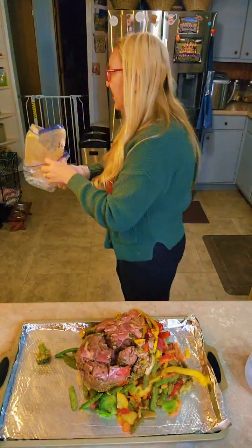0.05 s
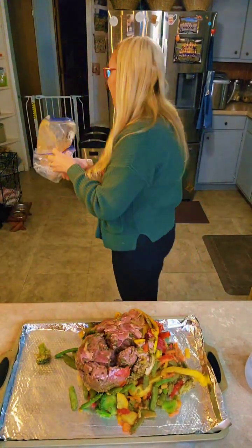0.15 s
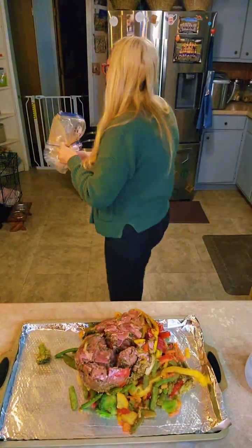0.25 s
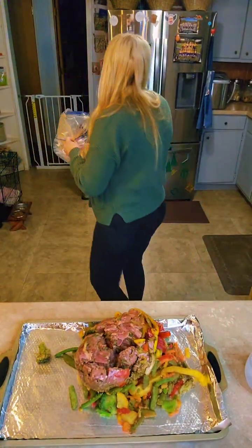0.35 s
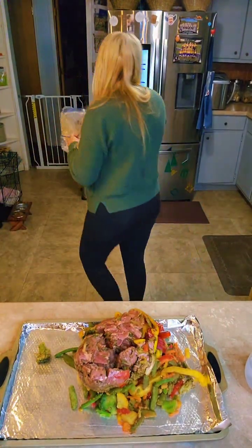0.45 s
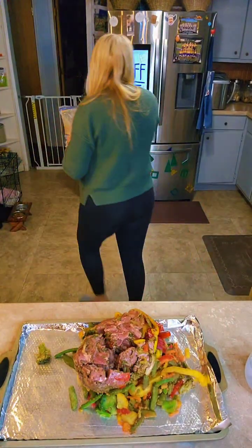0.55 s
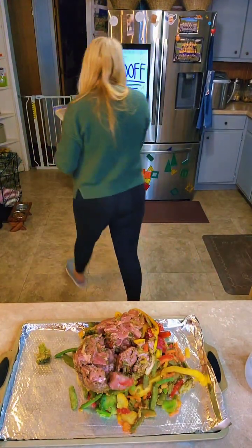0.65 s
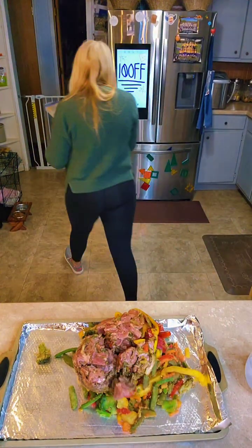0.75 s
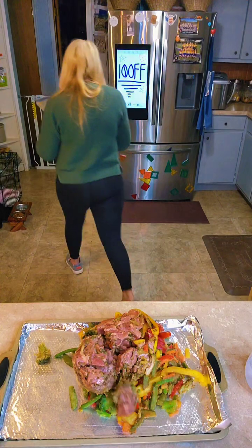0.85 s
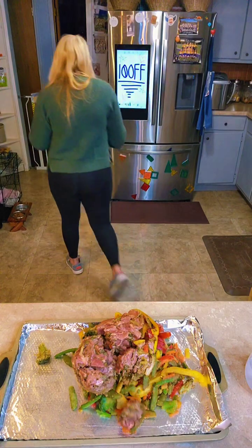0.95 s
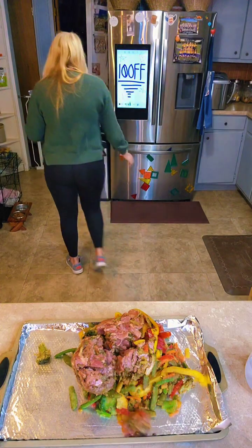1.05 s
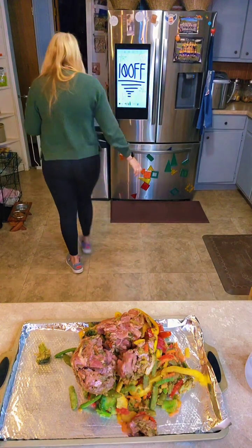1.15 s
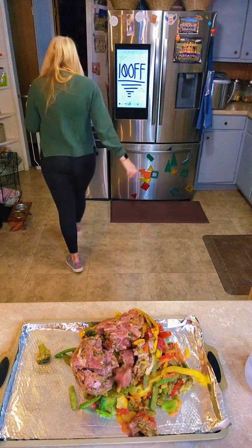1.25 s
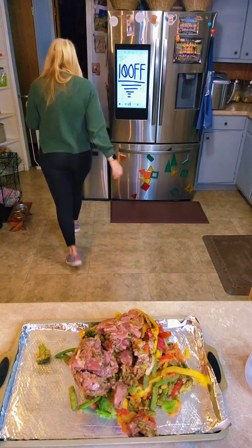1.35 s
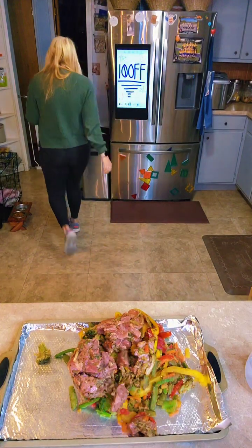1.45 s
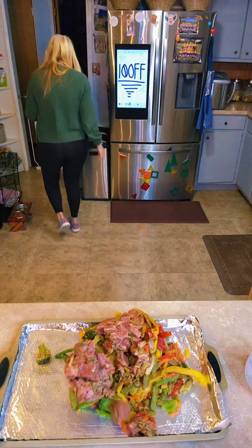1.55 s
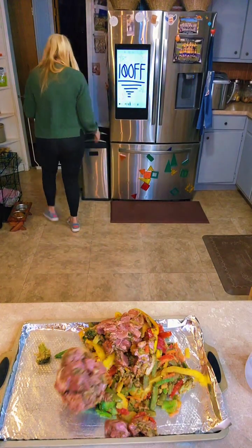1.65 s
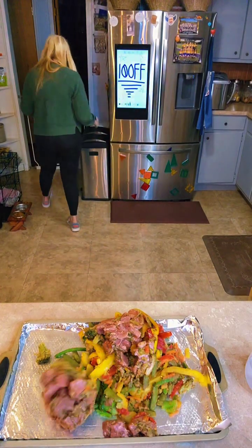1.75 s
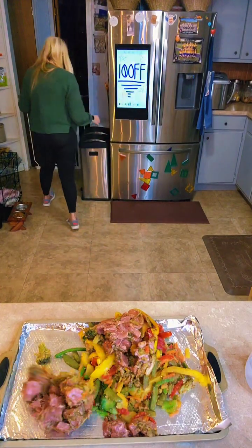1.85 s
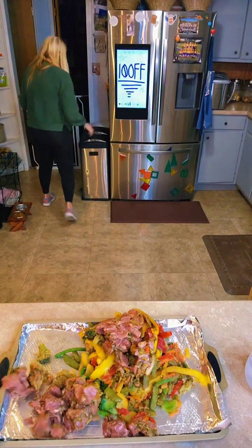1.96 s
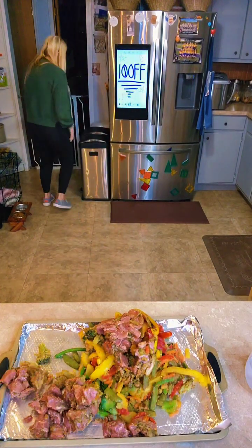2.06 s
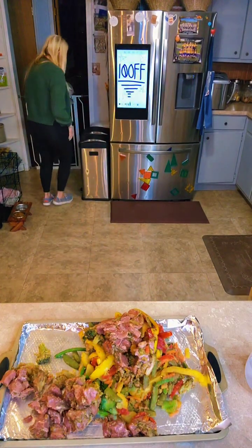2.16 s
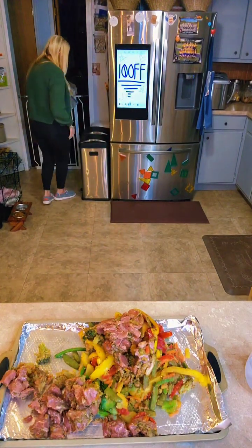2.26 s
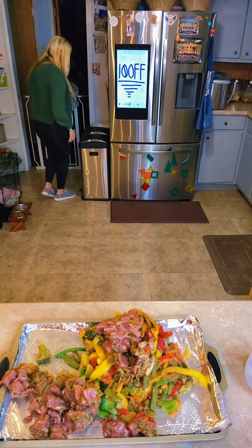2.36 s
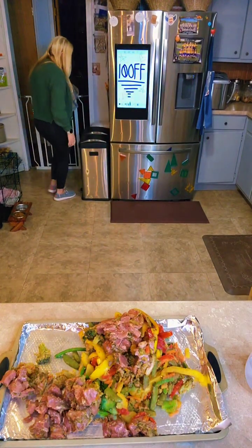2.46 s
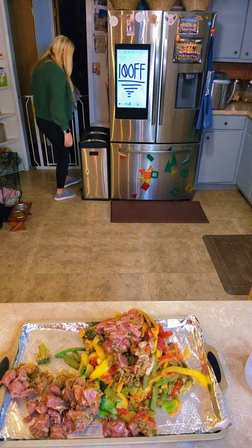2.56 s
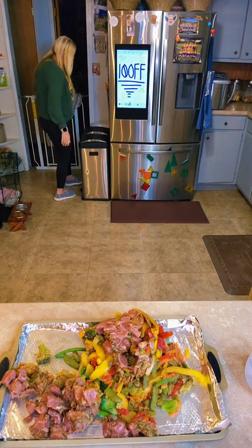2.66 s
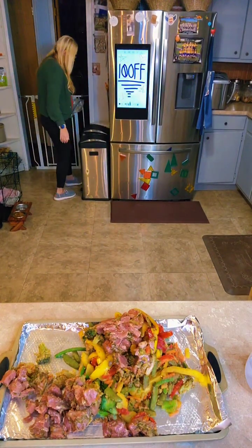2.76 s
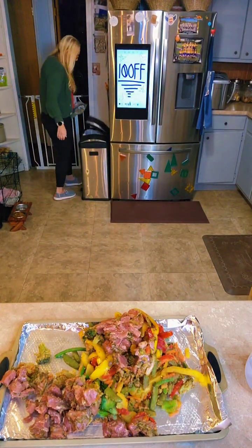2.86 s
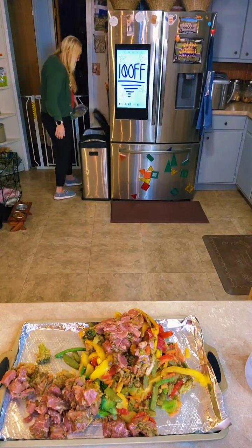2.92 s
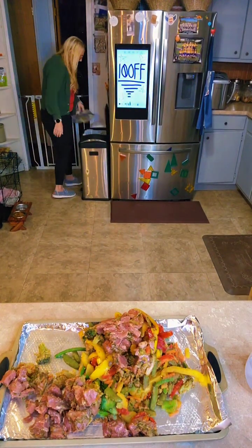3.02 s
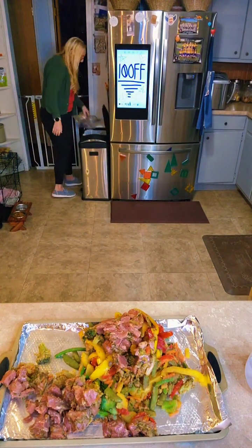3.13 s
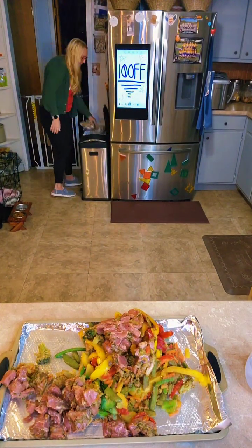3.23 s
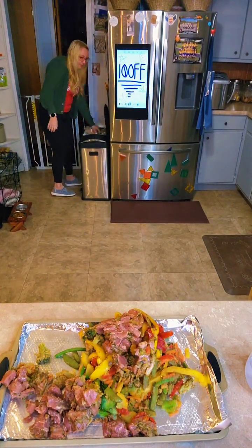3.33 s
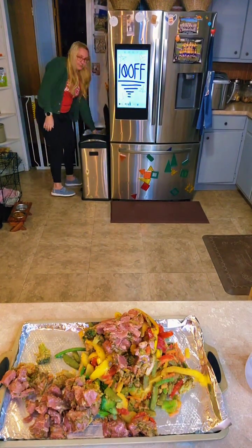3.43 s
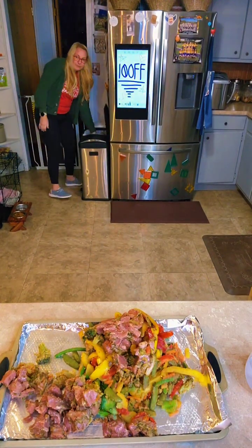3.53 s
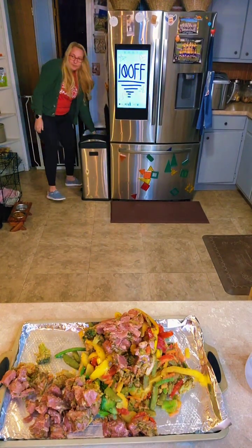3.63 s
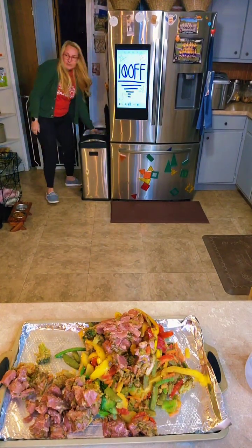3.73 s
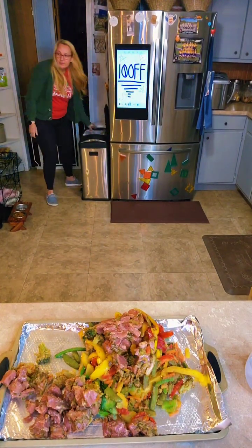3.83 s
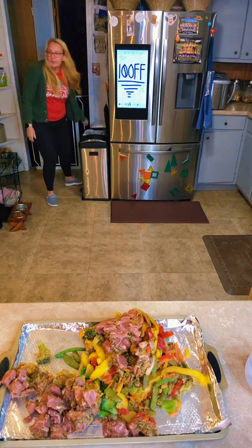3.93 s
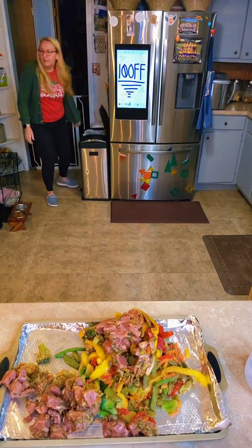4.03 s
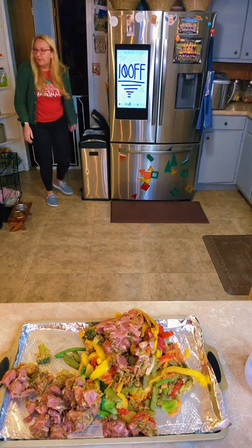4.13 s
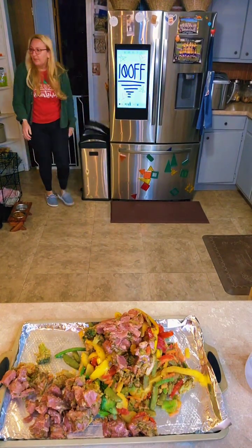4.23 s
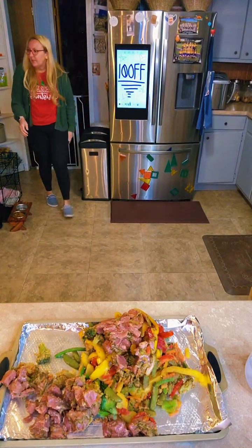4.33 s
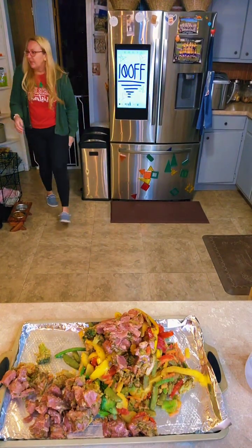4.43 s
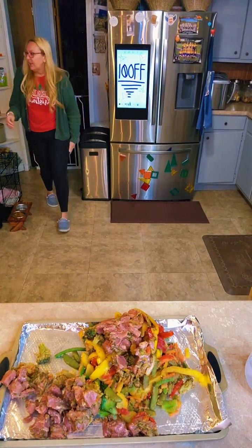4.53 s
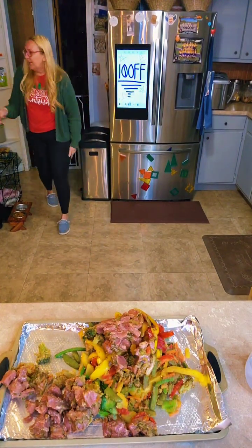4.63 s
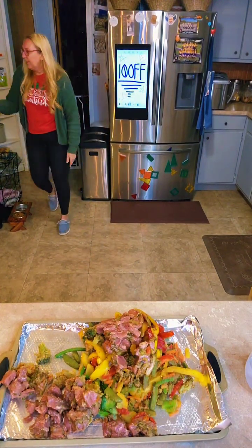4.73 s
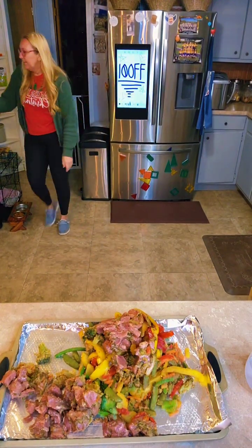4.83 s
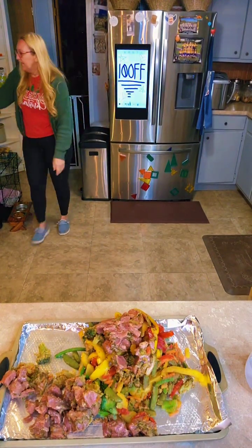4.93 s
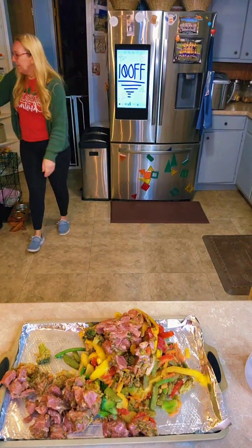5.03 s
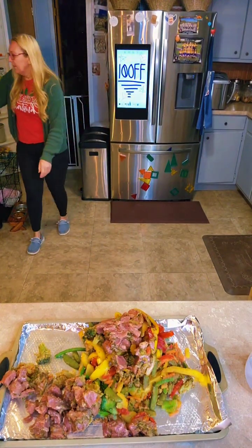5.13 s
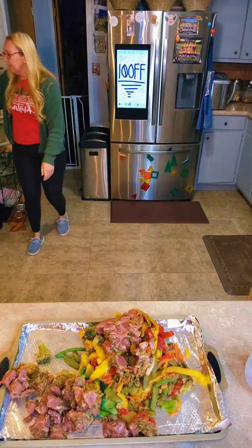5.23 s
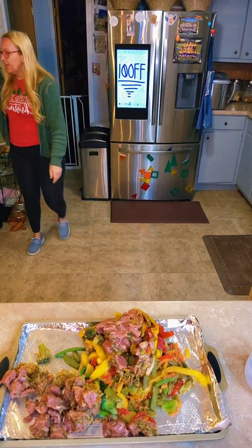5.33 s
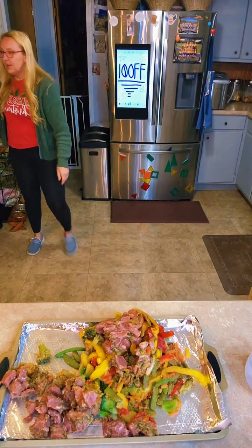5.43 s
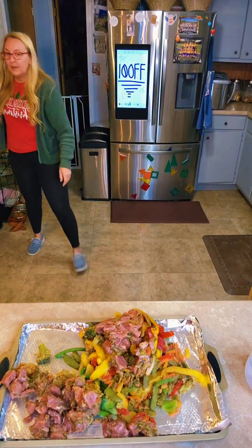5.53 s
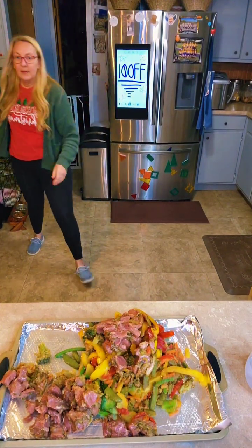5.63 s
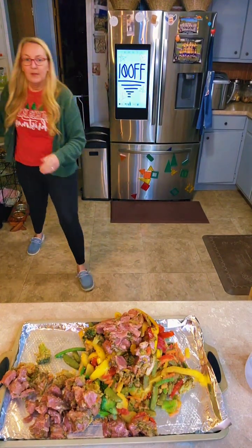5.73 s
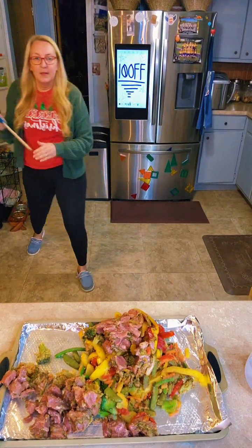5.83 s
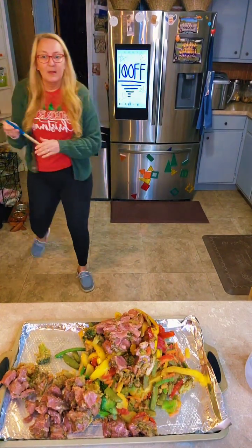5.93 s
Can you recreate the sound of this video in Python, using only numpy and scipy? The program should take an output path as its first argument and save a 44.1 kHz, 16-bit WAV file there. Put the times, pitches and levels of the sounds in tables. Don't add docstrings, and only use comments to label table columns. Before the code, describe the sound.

A plastic bag rustles, is crushed in loud sharp crackles, then a metal pedal bin clanks open and thuds shut in a kitchen.

```python
import sys
import numpy as np
from scipy import signal
from scipy.fft import rfft, irfft, next_fast_len
from scipy.io import wavfile
from scipy.ndimage import map_coordinates

SR = 44100
rng = np.random.default_rng(int(sys.argv[2]) if len(sys.argv) > 2 else 0)


def int16_out(signal):
    q = np.round(np.clip(np.atleast_2d(signal).T, -1, 1) * 32767)
    wavfile.write(sys.argv[1], SR, q.astype(np.int16))


def natural_amplitude(level_db):
    exponent = np.asarray(level_db, float) / 20
    return 10 ** exponent


N = 263806

FLOOR_HZ = 95
# freq_hz, density_db
THUD = [(15, -13), (35, -14), (50, 5), (65, -6), (90, 2.5), (110, -7), (130, -2), (180, -9), (230, -7.5),
        (300, -13), (500, -37.5)]
# freq_hz, density_db
SOLE = [(120, -2.5), (230, -3), (330, -3), (460, 2), (600, -0.5), (720, -2.5), (1100, -8.5), (2000, -30.5)]
# freq_hz, density_db
FILM = [(2000, -41), (4000, -9.5), (6000, -1.5), (9000, 3.5), (10500, -3.5), (12000, -29)]
# freq_hz, density_db
SPARKLE = [(8000, -38), (10500, 8), (13000, 6.5), (16000, -7)]


def unit(x):
    return x / np.sqrt(np.mean(x ** 2) + 1e-20)


def along(points, hz):
    f, v = np.transpose(points)
    return np.interp(np.log(hz + 1), np.log(f + 1), v)


def wobble(rate_hz):
    knots = rng.standard_normal(int(N * rate_hz / SR) + 4)
    return map_coordinates(knots, [np.arange(N) * rate_hz / SR])


def coloured(x, spectrum):
    m = next_fast_len(len(x) + 4096)
    gain = natural_amplitude(along(spectrum, np.fft.rfftfreq(m, 1 / SR)))
    return irfft(rfft(x, m) * gain, m)[:len(x)]


def noise(spectrum, size):
    return unit(coloured(rng.standard_normal(size), spectrum))


def add(track, start_s, sound):
    part = track[round(start_s * SR):][:len(sound)]
    part += sound[:len(part)]


def fade(t, t60_s, attack_s):
    return natural_amplitude(-60 * t / max(t60_s, .002)) * (1 - np.exp(-t / attack_s))


def swells(peaks_db, starts, lengths, rise_db_per_s, fall_db_per_s, idle_db):
    t = np.arange(0, N + 64, 64)[:, None] / SR
    rise_db = rise_db_per_s * np.maximum(starts - t, 0)
    fall_db = fall_db_per_s * np.maximum(t - starts - lengths, 0)
    power = natural_amplitude(idle_db) ** 2 + np.sum(natural_amplitude(peaks_db - rise_db - fall_db) ** 2, axis=1)
    return np.interp(np.arange(N) / SR, t[:, 0], np.sqrt(power))


def room_tails(count):
    # freq_hz, t60_s
    room_t60 = [(80, 0.68), (500, 0.41), (3000, 0.4), (8000, 0.33), (14000, 0.27)]
    hz, t, z = signal.stft(rng.standard_normal((count, SR // 2)), SR, nperseg=256)
    decay = natural_amplitude(-60 * t / along(room_t60, hz)[:, None])
    tails = signal.istft(z * decay, SR, nperseg=256)[1]
    return tails / np.linalg.norm(tails, axis=1, keepdims=True)


def echo(x, tail):
    return signal.fftconvolve(np.pad(x, (round(.004 * SR), 0)), tail)


def hiss():
    # freq_hz, density_db
    hiss_spectrum = [(20, 6), (100, 0.5), (1000, -9.5), (5000, -24.5), (16000, -10)]
    return natural_amplitude(-69.5) * noise(hiss_spectrum, N)


def tread():
    # full_load_s, thud_db, sole_over_thud_db
    steps = [(.08, -53.5, -4.5), (.4, -71, 5), (.63, -58.5, -2), (.82, -67, -7), (1.22, -60, -4.5),
             (1.74, -58, -2.5), (2.08, -55.5, -6), (2.64, -56, -3), (2.74, -62, -31), (3.08, -50, -12.5),
             (3.22, -53, 3.5), (3.5, -53.5, -11), (3.86, -50.5, -5), (4.3, -48, -6), (4.41, -55.5, -17),
             (4.7, -60.5, -4), (5.09, -59, 5), (5.58, -57, -17), (5.8, -69, -0.5)]
    full_load_s, thud_db, sole_db = np.transpose(steps)

    def load(level_db, idle_db):
        return swells(level_db, full_load_s, 0, 62, 63, idle_db)

    boards = noise([(FLOOR_HZ - 45, -30), (FLOOR_HZ, 0), (FLOOR_HZ + 45, -30)], N)
    thud = unit(natural_amplitude(2.2 * wobble(25)) * (noise(THUD, N) + 0.49 * boards))
    sole = unit(natural_amplitude(1.4 * wobble(30)) * noise(SOLE, N))
    return load(thud_db, -74.5) * thud + load(thud_db + sole_db, -91.5) * sole


def knocks():
    # start_s, peak_db, drawn_out (1-10), low_db
    padded = [(1.037, -46, 7, -3.5), (1.171, -63.5, 8.9, 16.5), (1.229, -51, 9.4, 4.5),
              (1.32, -49, 2.8, -4), (1.56, -48.5, 6.5, -3), (1.765, -41, 7.1, 0), (2.47, -43.5, 3.8, 11),
              (2.492, -35.5, 2.4, 9.5), (2.771, -49, 3.8, 6), (2.929, -54, 4.5, 13), (3.429, -64, 9.1, 15),
              (3.68, -47.5, 2.5, 4), (3.712, -50, 4, 5.5), (3.772, -43.5, 4.5, -4),
              (3.783, -40.5, 9.8, -17), (4.817, -36, 5.2, -3.5), (4.966, -40.5, 2.8, 2.5),
              (5.496, -51.5, 7.4, 4)]
    # start_s, peak_db, drawn_out (1-10), low_db
    hard = [(0.114, -42, 3.5, -16), (0.626, -51.5, 3, 11), (0.647, -48, 4.8, 5), (.702, -54, 4.9, 8),
            (1.668, -52.5, 3.6, 14.5), (2.077, -49.5, 3, 13.5), (2.102, -48.5, 4.7, 7),
            (2.205, -45.5, 5.9, 5), (2.51, -38, 4.3, 11), (2.549, -42, 5.7, 6), (3.853, -43, 2.5, -26),
            (4.567, -65, 2.3, 23.5), (5.172, -41.5, 1.5, -19), (5.191, -50, 6.7, 4), (5.555, -40, 5.25, -6),
            (5.762, -58.5, 3.8, 6)]
    # freq_hz, density_db
    edge_spectrum = [(500, -12), (1000, 5), (1600, 1.5), (2500, -3.5), (3000, -14.5), (7000, -35)]
    out = np.zeros(N)
    t = np.arange(SR // 3) / SR
    for rows, edge_db in [(padded, -11.5), (hard, 1.2)]:
        for start_s, peak_db, drawn_out, low_db in rows:
            t60_s = 0.059 * drawn_out
            puff = noise(SOLE, len(t)) + natural_amplitude(edge_db) * noise(edge_spectrum, len(t))
            push = 1.19 * noise(THUD, len(t)) + 0.19 * np.sin(2 * np.pi * FLOOR_HZ * t)
            contact = fade(t, t60_s, 0.0013) * puff
            floor = natural_amplitude(low_db) * fade(t, 1.35 * t60_s, 0.0045) * push
            add(out, start_s, natural_amplitude(peak_db - 8.5) * (contact + floor))
    return out


def rustle():
    # start_s, length_s, crinkle_db, scuff_over_crinkle_db
    rubs = [(-.04, 0.21, -51, -5), (0.164, 0.21, -59, -2.5), (0.36, 0.13, -65, 4), (0.464, 0.13, -48, -8),
            (0.65, 0.29, -60.5, -6.5), (1.142, 0.44, -62.5, -8.5), (1.587, 0.22, -43, -10),
            (2.043, 0.21, -53, -8), (2.304, 0.17, -69, -9), (2.6, 0.32, -93, 0), (2.97, 0.26, -40.5, -10),
            (3.098, 0.24, -41.5, -6), (3.447, 0.18, -53.5, -7), (3.664, 0.054, -62.5, -0.5),
            (3.837, 0.015, -61.5, 13), (3.953, .02, -66.5, -15), (4.262, 0.074, -58.5, -0.5),
            (4.46, 0.42, -64, -4), (4.821, 0.078, -40.5, -17.5), (4.991, 0.1, -48.5, -4),
            (5.078, 0.064, -44, -10), (5.156, 0.084, -52, 4), (5.498, 0.033, -64.5, 1),
            (5.6, 0.15, -73, -2), (5.74, 0.057, -64, -2)]
    # freq_hz, density_db
    scuff_spectrum = [(600, -33), (1200, 2), (2000, 1), (3000, -2), (4500, -2), (7000, -6)]
    start_s, length_s, crinkle_db, scuff_db = np.transpose(rubs)
    rise_s, fade_db_per_s = 0.026, 139.5

    def stroke(level_db, idle_db):
        hold_s = np.maximum(length_s - rise_s, 0)
        return swells(level_db, start_s + rise_s, hold_s, 20 / rise_s, fade_db_per_s, idle_db)

    strength_db = np.minimum(5 * rng.exponential(size=N), 12)
    folds = (rng.random(N) < 260 / SR) * natural_amplitude(strength_db) * rng.standard_normal(N)
    rubbing = 0.16 * unit(folds) + natural_amplitude(1.3 * wobble(60)) * rng.standard_normal(N)
    crinkle = unit(coloured(rubbing, FILM)) + natural_amplitude(-1) * unit(coloured(rubbing, SPARKLE))
    scraping = natural_amplitude(2.0 * wobble(25)) * rng.standard_normal(N) + .2 * unit(folds)
    scuff = unit(coloured(scraping, scuff_spectrum))
    return stroke(crinkle_db - 10.5, -82.5) * crinkle + stroke(crinkle_db + scuff_db, -72.5) * scuff


def singing():
    # start_s, end_s, pitch_hz, width_hz, level_db
    sung_bands = [(3.852, 3.92, 1700, 130, -53), (3.852, 3.88, 3450, 150, -59),
                  (3.852, 3.88, 2390, 110, -62), (5.01, 5.17, 4400, 140, -61), (5.02, 5.17, 4730, 140, -59),
                  (5.25, 5.31, 4230, 130, -60), (5.01, 5.1, 5450, 150, -59), (5.1, 5.19, 5500, 110, -54),
                  (5.09, 5.2, 6200, 500, -53), (5.01, 5.14, 6900, 400, -55), (5.02, 5.13, 7850, 200, -59),
                  (5.185, 5.21, 1550, 150, -53), (5.22, 5.3, 1480, 100, -66), (5.0, 5.07, 2000, 100, -67),
                  (5.12, 5.17, 2500, 80, -67), (5.2, 5.28, 6500, 500, -57), (3.58, 3.62, 5300, 300, -64),
                  (3.8, 3.815, 3000, 400, -57), (5.0, 5.2, 580, 90, -61), (3.965, 4.05, 7000, 1200, -64),
                  (4.83, 4.96, 3150, 200, -69), (5.005, 5.17, 1230, 70, -61), (2.078, 2.1, 2700, 200, -56),
                  (1.88, 1.92, 3500, 450, -60)]
    out = np.zeros(N)
    for start_s, end_s, hz, width_hz, level_db in sung_bands:
        t = np.arange(round((end_s - start_s + 0.086) * SR)) / SR
        near, far = width_hz / 2, 4 * width_hz
        band = noise([(hz - far, -40), (hz - near, -3), (hz + near, -3), (hz + far, -40)], len(t))
        swell_db = np.interp(t, [0, .02, end_s - start_s, t[-1]], [-8, -1, -1, -28])
        add(out, start_s, natural_amplitude(level_db + swell_db) * band)
    return out * natural_amplitude(1.5 * wobble(40))


def trembling_tones(rows):
    out = np.zeros(N)
    for start_s, end_s, from_hz, to_hz, level_db in rows:
        span = slice(round(start_s * SR), round(end_s * SR))
        share = np.linspace(0, 1, span.stop - span.start)
        tremble = 1 + .018 * wobble(120)
        grip = natural_amplitude(1.2 * wobble(45)) * (1 + .4 * wobble(110))
        hz = (from_hz + share * (to_hz - from_hz)) * tremble[span]
        swell = natural_amplitude(level_db) * np.abs(np.sin(np.pi * share)) ** .5 * grip[span]
        out[span] += 2.12 * swell * np.sin(2 * np.pi * np.cumsum(hz) / SR)
    return out


def squeaks_and_groans():
    # start_s, end_s, start_hz, end_hz, level_db
    damper = [(4.575, 4.76, 2440, 2430, -73), (4.74, 4.86, 2410, 2410, -68.5),
              (4.83, 4.98, 2420, 2380, -73), (4.585, 4.63, 2950, 2930, -80), (4.585, 4.61, 1900, 1890, -77),
              (4.585, 4.65, 1140, 1130, -78), (4.6, 4.7, 1350, 1320, -77), (4.67, 4.82, 1090, 1085, -75.5),
              (4.73, 4.8, 1340, 1350, -79), (5.07, 5.13, 1235, 1235, -62), (5.16, 5.21, 1240, 1290, -64),
              (5.34, 5.44, 1490, 1455, -78), (5.74, 5.98, 1650, 1570, -74.5)]
    # start_s, end_s, start_hz, end_hz, level_db
    walls = [(2.472, 2.53, 500, 490, -54.5), (2.585, 2.71, 235, 222, -59.5), (2.57, 2.64, 88, 87, -46.5),
             (2.69, 2.77, 92, 90, -57), (3.8, 3.99, 497, 472, -62), (3.865, 3.905, 148, 290, -53.5),
             (3.92, 3.97, 260, 248, -59.5), (5.07, 5.1, 554, 524, -63), (5.0, 5.03, 900, 890, -66),
             (5.07, 5.11, 875, 890, -63), (5.74, 5.815, 402, 386, -70.5)]
    return trembling_tones(damper) + trembling_tones(walls)


def strike_bin(contacts, modes, clash_spectrum, clash_room_db, ring_room_db):
    out = np.zeros(N)
    t = np.arange(SR // 3) / SR
    for (start_s, blow_db, clash_db), tail in zip(contacts, room_tails(len(contacts))):
        ring = np.zeros(len(t))
        for hz, mode_db, t60_s in modes:
            strength = natural_amplitude(mode_db + rng.normal(0, 1.0))
            ring += strength * fade(t, t60_s, 0.0023) * np.sin(2 * np.pi * hz * t)
        ring *= natural_amplitude(blow_db - 12.0)
        clash = natural_amplitude(clash_db + 5.5) * fade(t, 0.034, 0.0024) * noise(clash_spectrum, len(t))
        add(out, start_s, ring + clash)
        add(out, start_s, echo(natural_amplitude(clash_room_db) * clash + natural_amplitude(ring_room_db) * ring, tail))
    return out


def pedal_bin():
    # start_s, blow_db, clash_db
    pedal = [
        (2.478, -39, -66),
        (2.51, -48, -52),
        (2.6, -44.5, -69),
        (3.79, -60, -67),
        (3.86, -41, -69.5),
    ]
    # start_s, blow_db, clash_db
    opening = [
        (2.9025, -41, -23),
        (2.908, -11, -18),
        (2.9165, -27, -19),
        (2.9215, -14.5, -20.5),
        (2.93, -26, -21.5),
        (2.94, -26.5, -28),
    ]
    # start_s, blow_db, clash_db
    closing = [
        (4.131, -43, -44.5),
        (4.1405, -35, -32.5),
        (4.1452, -20, -20.5),
        (4.1495, -17, -18),
        (4.155, -8, -23.5),
        (4.176, -23.5, -24.5),
    ]
    # freq_hz, level_db, t60_s
    open_modes = [(98.4, -8, .2), (161, 3, 0.13), (215.6, 3.5, 0.16), (290, -5, 0.15), (355, 1, 0.093),
                  (470, -14, 0.063), (550, -9.5, 0.17), (605, -3, 0.09), (803, -20.5, 0.1),
                  (1060, -16, 0.17), (1310, -9, 0.097)]
    # freq_hz, level_db, t60_s
    shut_modes = [(93.3, 3.5, 0.17), (126.3, 0.5, 0.28), (190, -20, 0.43), (255, -1, 0.19),
                  (282.5, 5, 0.11), (419, -5, 0.37), (446, 5, 0.17), (493, 0.5, 0.18), (576, -6.5, 0.25),
                  (621, -11, 0.33), (716, 0.5, 0.11), (810, -21.5, 0.3), (1134, -20.5, 0.39),
                  (1325, -20, 0.18)]
    # freq_hz, density_db
    open_clash = [(55, -47), (110, -3.5), (250, 4), (500, -2), (1000, -9.5), (2000, -12), (4000, -15.5),
                  (8000, -13), (12000, -11.5), (16000, -18)]
    # freq_hz, density_db
    shut_clash = [(55, -50), (100, -10.5), (250, -6.5), (500, -5), (1000, -11), (2000, -16.5),
                  (4000, -17.5), (8000, -17), (12000, -16), (16000, -26.5)]
    trodden = strike_bin(pedal, shut_modes, open_clash, -2, -5.5)
    opened = strike_bin(opening, open_modes, open_clash, 0.32, -19.0)
    closed = strike_bin(closing, shut_modes, shut_clash, 2.0, -9.5)
    return trodden + opened + closed


def snap_family(rows, body, sparkle_db, air_db, room_db, attack_s):
    # freq_hz, density_db
    air_spectrum = [(11000, -28), (12800, 3), (16000, 1.5)]
    out = np.zeros(N)
    t = np.arange(SR // 8) / SR
    tails = room_tails(9)
    for k, (start_s, peak_db, body_db, drawn_out) in enumerate(rows):
        ragged = natural_amplitude(1.66 * np.repeat(rng.standard_normal(len(t) // 64 + 1), 64)[:len(t)])
        fold = np.exp(.04 * rng.standard_normal())
        film = noise(FILM, len(t)) + natural_amplitude(body_db + 14) * noise(np.multiply(body, [fold, 1]), len(t))
        sheen = natural_amplitude(sparkle_db + 16.5) * noise(SPARKLE, len(t)) + natural_amplitude(air_db) * noise(air_spectrum, len(t))
        shape = ragged * fade(t, 0.0145 * drawn_out, attack_s) * (film + sheen)
        snap = natural_amplitude(peak_db - 8.5) * shape / np.abs(shape).max()
        add(out, start_s, snap)
        add(out, start_s, natural_amplitude(room_db + 9.0) * echo(snap, tails[k % len(tails)]))
    return out


def snaps():
    # start_s, peak_db, body_db, drawn_out (1.8-11)
    carried = [(.0388, -39, -21, 2), (.1067, -25, -33, 2.8), (.19, -31, -26, 7.1), (.2812, -33, -19, 2.9),
               (.3472, -34, -14.5, 1.8), (.453, -34.5, -14, 4.3), (.4927, -35.5, -15, 5.4),
               (.888, -47, -22, 2), (.8945, -33, -16, 1.8), (.946, -52, -19, 3), (.96, -56, -24, 5.3),
               (.004, -35, -15, 3.5), (1.041, -32.5, -16, 11), (1.066, -33.5, -13, 4.1)]
    # start_s, peak_db, body_db, drawn_out (0.87-13)
    crushed = [(1.4381, -33.5, -39, 2.7), (1.5591, -20.5, -35, 2.6), (1.5655, -25.5, -19.5, 6.5),
               (1.5995, -20.5, -25, 1.4), (1.6135, -26, -26, 6), (1.6165, -9, -28, 3), (1.6197, -4, -29, 4),
               (1.6285, -5, -29, 2.5), (1.6614, -14.5, -30, 2.6), (1.6965, -6.5, -28, 7),
               (1.7074, -5.5, -20.5, 2.9), (1.7282, -12, -21, 2.5), (1.76, -12.5, -26, 3.1),
               (1.7655, -13, -24, 4.1), (1.8218, -10.5, -26.5, 1.3), (1.83, -19.5, -22, 5),
               (1.914, -30.5, -22, 4), (1.954, -20, -32, 3.1), (2.0105, -19, -32, 3.2),
               (2.0245, -22, -19.5, 1.7), (2.08, -29.5, -17, 13), (2.2068, -25, -6, 0.87),
               (2.21, -29.5, -5, 4.1), (2.273, -26.5, -25, 1.3)]
    # start_s, peak_db, body_db, drawn_out (1.6-11)
    ticks = [(2.4755, -41, -10, 4.4), (2.5097, -26.5, 7, 3.7), (2.6988, -46.5, -4, 2.9),
             (3.2195, -27, -5, 2), (3.803, -37.5, 6, 1.6), (3.8521, -27, -11.5, 2.4),
             (3.9684, -39.5, -34, 2.3), (4.8238, -34.5, -16, 11), (5.1743, -26.5, -9, 3.6),
             (5.2497, -32, -29, 3.6), (2.862, -47, -22, 3), (5.5142, -44.5, -19, 2.1),
             (5.7796, -55, -14, 2), (5.844, -49, -27, 5.1)]
    # start_s, peak_db, body_db, drawn_out (0.5-3.3)
    clicks = [(.1067, -14.5, -32, .5), (.9378, -30, -24, .6), (.8762, -36, -24, .8), (2.0102, -13, -30, .5),
              (2.0237, -12, -22, .5), (2.5092, -28, -12, .8), (2.699, -44, -14, 1.5), (.829, -49, -25, 1),
              (.878, -44, -24, 2), (.939, -37, -26, 1.6), (1.0385, -34, -24, 1.5), (1.4894, -45, -14, 2.8),
              (1.5283, -41, -17.5, 3.3), (1.576, -28, -25, 1), (1.6237, -11, -28, 1),
              (1.6254, -10, -28, 1.5), (1.6345, -15, -25, .8), (1.6402, -13, -25, .5),
              (1.6495, -19, -25, 1), (1.7005, -14, -18, .8), (1.7193, -12, -25, .5), (1.7395, -17, -25, 1),
              (1.78, -20, -25, 1), (1.8172, -19, -20, .8), (1.8245, -17, -25, .8), (1.8435, -22, -25, 1),
              (1.942, -38, -30, 1.5), (2.348, -37, -29, 1.5), (3.1312, -27, -14, 1), (3.144, -31, -16, 1),
              (3.159, -30, -20, 1), (3.2047, -29, -20, 1), (3.2612, -26, -20, 1), (3.229, -28, -20, .6),
              (3.1, -30, -20, 1), (3.184, -30, -20, .6), (5.048, -34, -20, 1), (5.141, -33, -20, .6),
              (5.184, -32, -16, 1), (1.428, -48, -14, 1.5), (3.309, -32, -20, 1), (4.9008, -33, -20, .8),
              (4.9122, -33, -20, .8), (5.2527, -30, -20, 1), (.2155, -32, -28, 1), (.299, -33, -25, 1),
              (.3685, -38, -28, 1.5), (1.9535, -22, -28, .8), (1.5592, -24, -26, 1)]
    # freq_hz, density_db
    sheet_body = [(1200, -30), (2200, -7), (3500, -2.5), (5000, -2.5), (6500, -8), (8000, -27)]
    # freq_hz, density_db
    fold_body = [(1200, -22), (2200, -19), (2800, 5.5), (3600, -3.5), (4600, -7.5), (6500, -12.5)]
    return (snap_family(carried, sheet_body, -17.5, -12, -5.5, 0.002)
            + snap_family(crushed, fold_body, -18, -9.5, -12.5, 0.00036)
            + snap_family(ticks, fold_body, -28, -21.5, -10, 0.00055)
            + snap_family(clicks, fold_body, -25, -2.8, -21, 0.00017))


def scene():
    background = hiss() + tread() + knocks() + rustle()
    steel_bin = singing() + squeaks_and_groans() + pedal_bin()
    return (background + steel_bin + snaps())[None]


def low_pass(x):
    return signal.sosfilt(signal.butter(12, 16970, fs=SR, output="sos"), x)


def record(dry):
    # freq_hz, gain_db
    port_response = [(20, 0), (5000, 1.5), (7000, 3), (8200, 8), (9000, 11.5), (9450, 9), (9750, 2.5),
                     (11600, -4), (12400, -9), (15000, -4), (16000, -8)]
    top_hz = 15720
    ported = coloured(dry[0], port_response)
    limited = coloured(ported, [(top_hz, 0), (top_hz + 150, -60)])
    return low_pass(limited[None])


dry = scene()
out = record(dry)
int16_out(out)
```